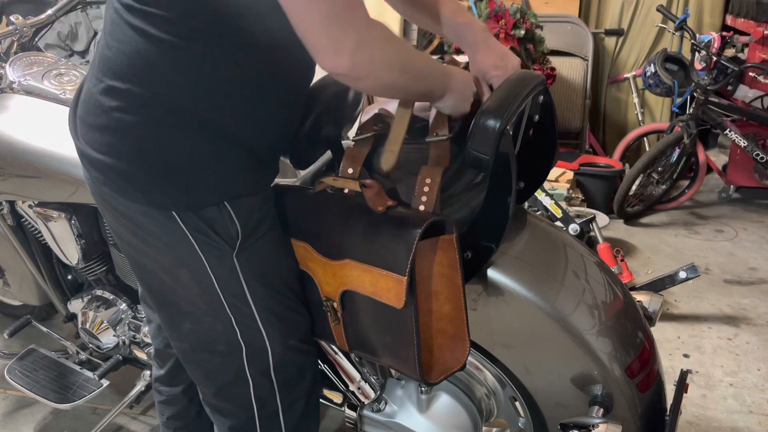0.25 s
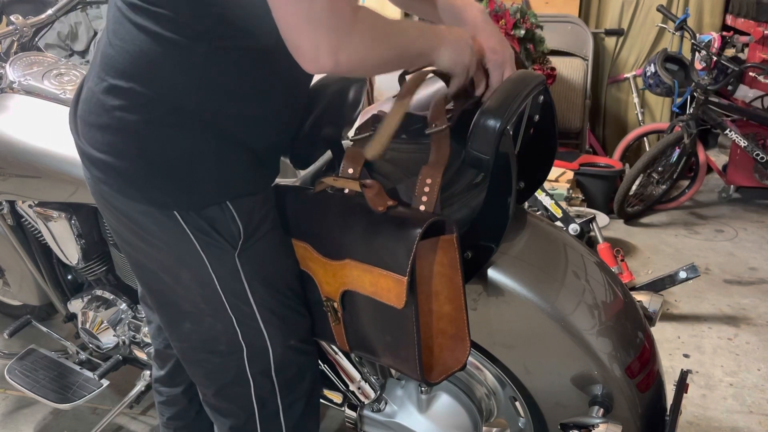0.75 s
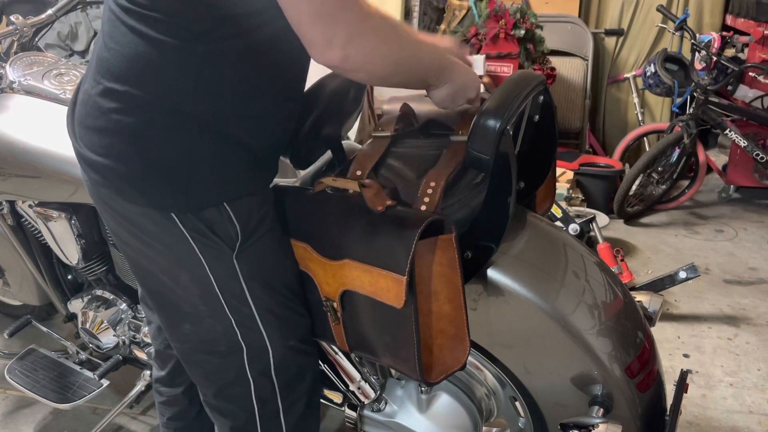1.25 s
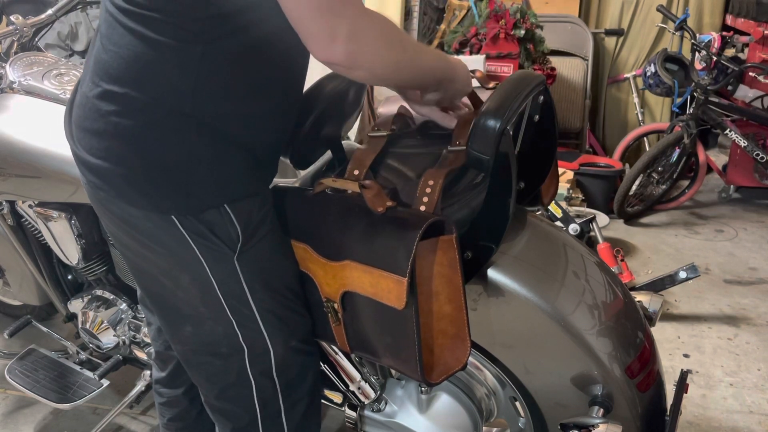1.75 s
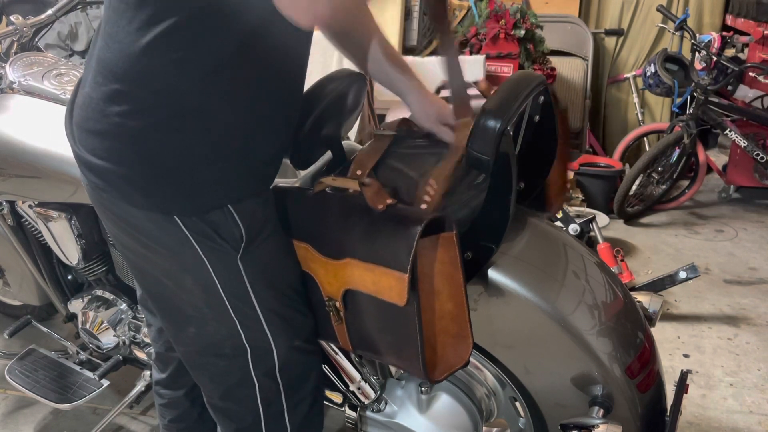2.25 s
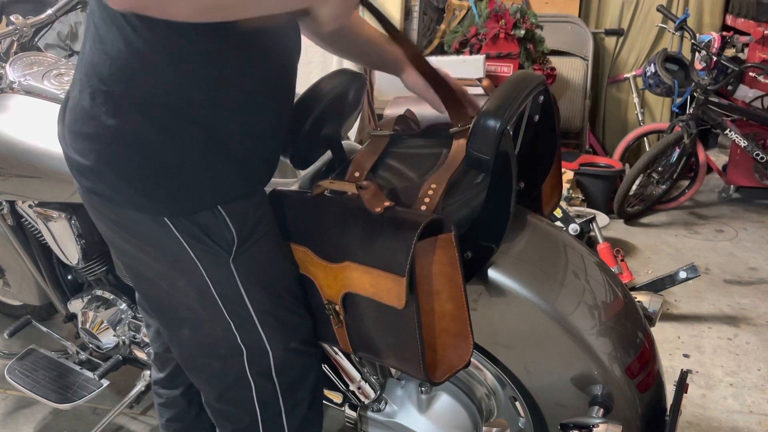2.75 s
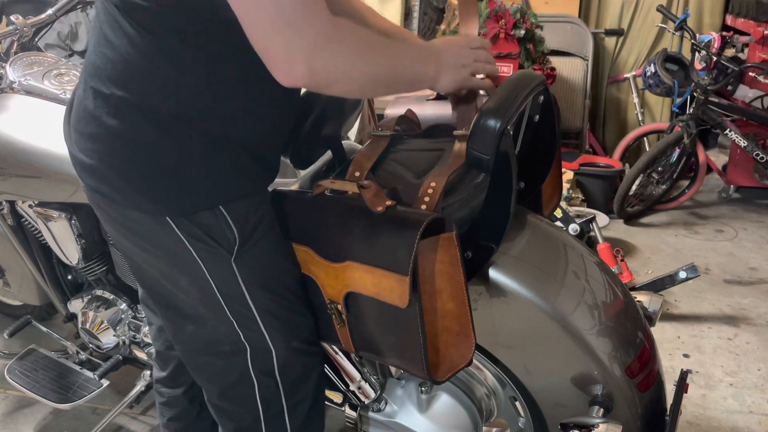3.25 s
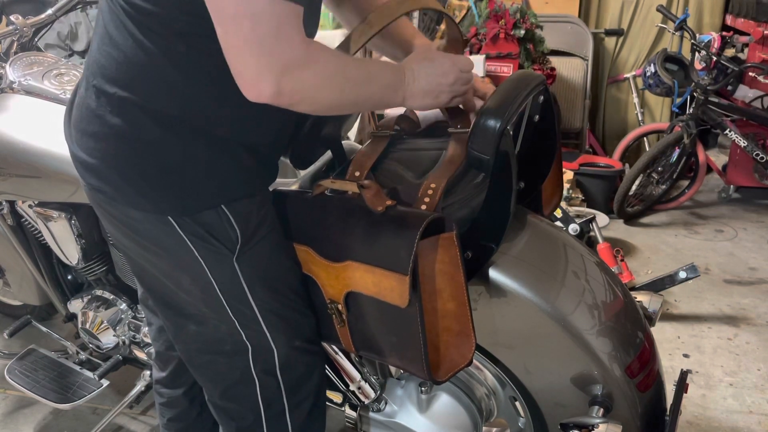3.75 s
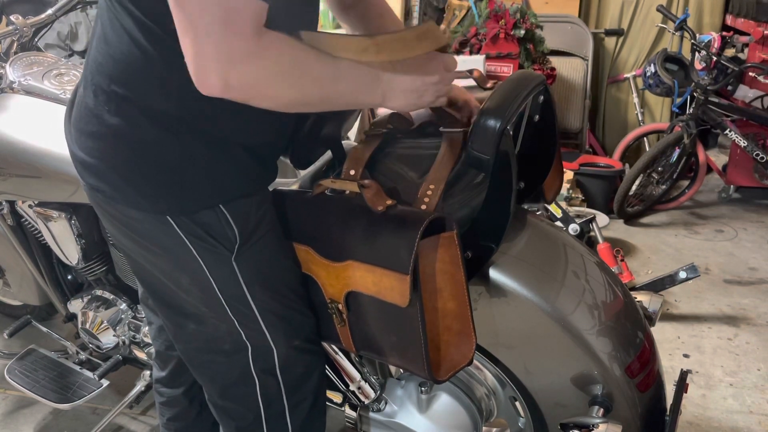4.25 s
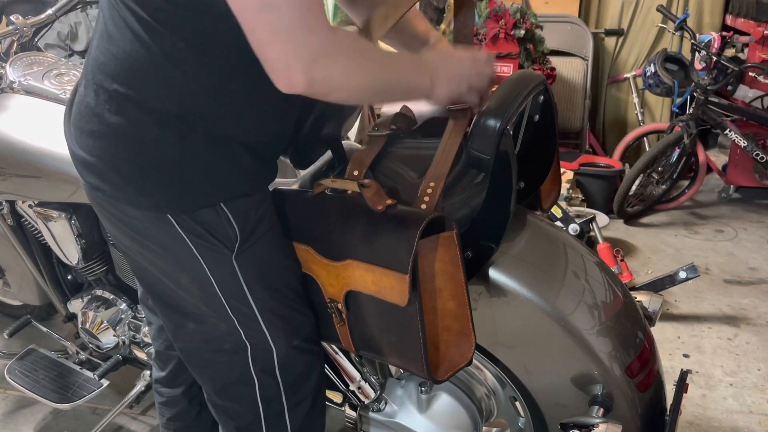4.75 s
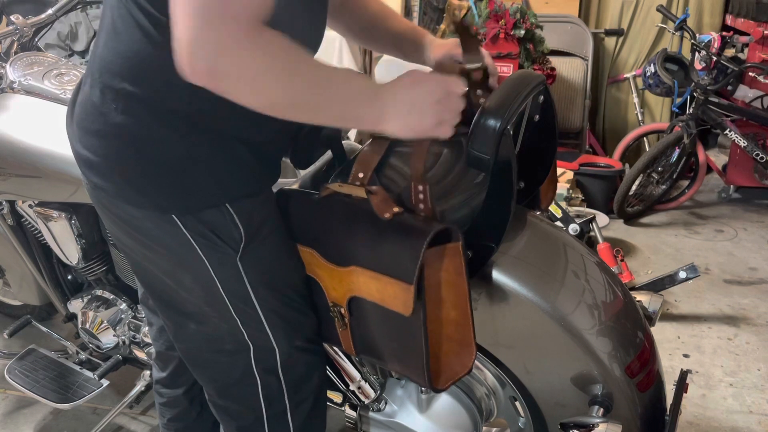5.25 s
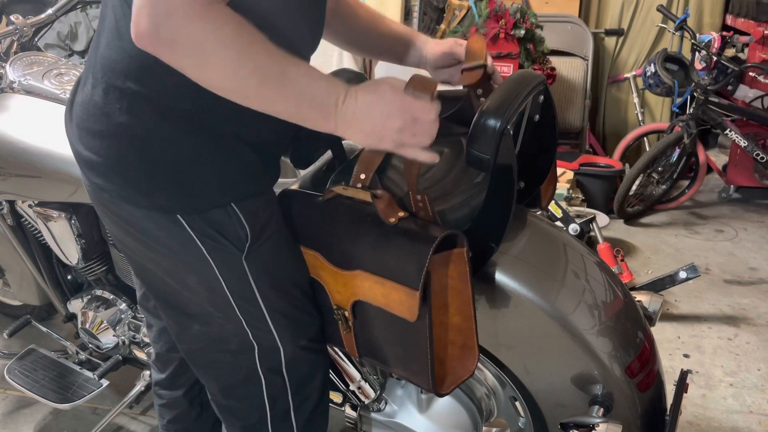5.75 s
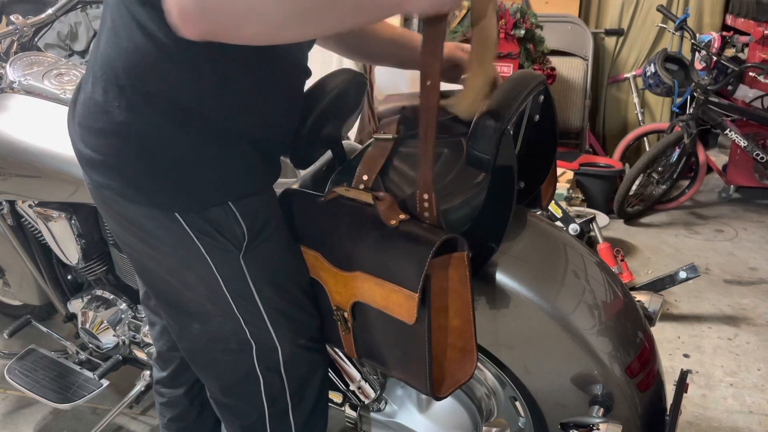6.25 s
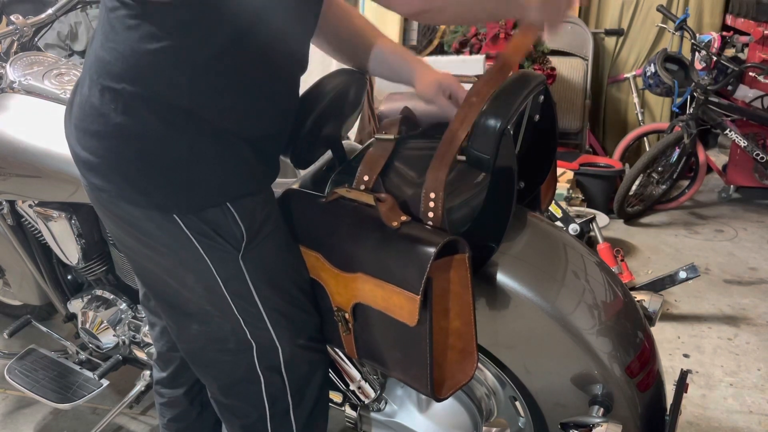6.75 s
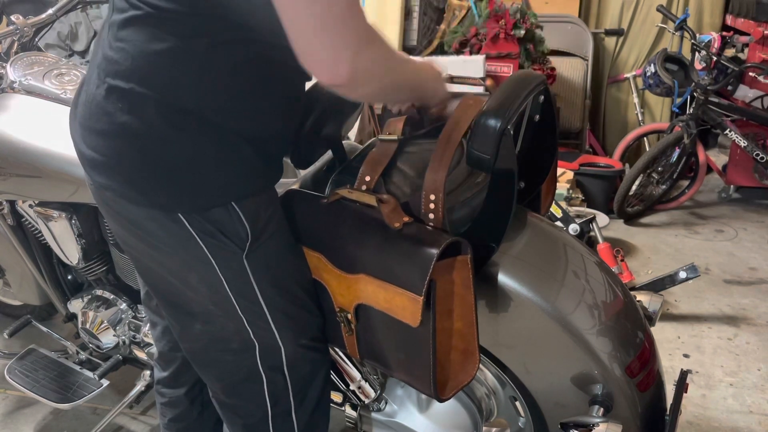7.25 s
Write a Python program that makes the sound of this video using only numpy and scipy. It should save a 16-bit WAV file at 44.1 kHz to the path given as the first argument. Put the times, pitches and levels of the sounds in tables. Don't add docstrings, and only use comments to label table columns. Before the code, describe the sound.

In a quiet garage with faint air and low hum, a soft knock and a slowing run of dry stitch ticks open the first 0.3 seconds. From 0.5 to 1.3 a loose buckle pings high and bright, its roller ringing on thinly, over light rustle and dull knocks. A far motor whines faintly around 0.9 to 1.7, and a short leather creak quickens at 1.65. Around 2.1 to 2.3 comes a forceful cluster: hard clicks, hollow booms, snaps and jingling. Sparse leather ticks follow, with sharper clicks near 3.5 and a quick stitch run at 3.9. From 5.0 to 5.5 a finger-damped clasp clatters rapidly, with a strap hiss at 5.2. Brief clinks return at 5.75 to 5.95, then a whip-like tick, knocks and jingles at 6.5 and 6.85. Handling fades to a last soft knock near 7.3, all with short concrete echoes.

```python
import sys
import numpy as np
from scipy import signal
from scipy.fft import rfft, irfft, next_fast_len
from scipy.io import wavfile
from scipy.ndimage import uniform_filter1d

SR = 44100
rng = np.random.default_rng(int(sys.argv[2]) if len(sys.argv) > 2 else 0)


def linear_from_db(decibels):
    return 10 ** (np.asarray(decibels, float) / 20)


def store_wav(level_fs):
    pcm = np.round(np.clip(np.atleast_2d(level_fs), -1, 1) * 32767)
    wavfile.write(sys.argv[1], SR, pcm.T.astype(np.int16))


N = 331191

# f/Hz, level/dB per Hz
AIR_SPECTRUM = [(15, -53), (25, 5), (200, -10), (293, -7.5), (840, -16), (962, -8), (1370, -22),
                (4140, -23), (13600, -34.5), (14800, -26.5), (16000, -53)]
AIR_DB = -70.5
# f/Hz, level/dB rms
HUM_TONES = [(39.5, -81), (122, -81.5)]

# t/s, low modes/dB, middle modes/dB, high modes/dB, free swing/s
BUCKLE_BLOWS = [(0.0014, -52, -57.5, -55, 0.023), (0.499, -57, -73, -75, .07),
                (0.531, -60, -71, -78, 0.039), (0.5721, -36.5, -51, -54, 0.023),
                (0.59, -27.5, -57, -41, 0.019), (0.6462, -34, -56, -55, 0.011),
                (0.8584, -24.5, -40.5, -44, 0.034), (0.8865, -22.5, -60, -29.5, 0.016),
                (1.0062, -42, -60, -56, 0.014), (1.0334, -51, -51.5, -47, 0.045),
                (1.0985, -46, -55, -42, 0.0072), (1.1043, -39, -62, -35.5, 0.037),
                (1.1182, -28, -58, -32, 0.016), (1.2250, -30.5, -41, -43, 0.033),
                (1.2612, -53, -60, -31, 0.022), (2.092, -52, -51, -42, 0.0053),
                (2.151, -34, -50, -32, 0.016), (2.165, -32, -37, -23.5, 0.037),
                (2.1888, -32, -39, -30.5, 0.036), (2.229, -24, -42, -35, 0.018),
                (2.2471, -20, -45, -37.5, 0.03)]
# t/s, low modes/dB, middle modes/dB, high modes/dB, free swing/s
LATE_BUCKLE_BLOWS = [(5.1, -28, -31, -36, 0.014), (5.1705, -39, -39, -27, 0.021),
                     (5.877, -45, -64, -52, 0.022), (5.8973, -35, -51, -55, 0.023),
                     (5.907, -26, -52, -43, 0.057), (5.93, -33, -46.5, -60, 0.063),
                     (6.214, -63, -58.5, -59, 0.027), (6.506, -53, -57, -51, .014),
                     (6.5264, -30, -40.5, -37, 0.016), (6.548, -39, -53, -43, 0.083),
                     (6.5875, -31, -42, -50, 0.012), (6.7976, -44.5, -56.5, -73, 0.0078),
                     (6.838, -29.5, -66, -35, 0.012), (6.8639, -36, -38.5, -46, .027),
                     (6.88, -43.5, -43, -36, 0.056), (6.93, -45, -68, -54, 0.12),
                     (7.0175, -53, -59, -61, 0.021)]
# f/Hz, level/dB, share of free swing, group (0 low, 1 middle, 2 high, 3 tongue)
BUCKLE_MODES = [(3960, -4, 0.77, -0.5), (4150, -17, 0.64, 3), (8715, 0.5, 1, 1), (8560, -14, 0.63, 2),
                (13730, -2, 0.74, 2), (13300, -19, .7, 2), (14300, -20.5, .6, 2)]
FREE_T60_S, LANDED_T60_S = 0.2, 0.019
CLINK_DB = -4

# t/s, low mode/dB, middle mode/dB, high mode/dB, free swing/s
ROLLER_BLOWS = [(0.0014, -62, -64, -94, 0.024), (0.572, -53, -77, -70, 0.025),
                (0.5901, -51, -67, -72, 0.042), (0.628, -50, -62, -65, 0.041),
                (0.6457, -63, -83, -65, 0.05), (0.8583, -49, -50, -53, 0.052),
                (0.8875, -50, -52, -55, 0.11), (0.9104, -45.5, -62, -60, 0.05),
                (1.1046, -52, -53, -68, 0.042), (1.118, -49, -53, -64, 0.055),
                (1.2235, -53, -46, -66, 0.037), (1.261, -52, -61, -52, 0.05), (2.1504, -52, -43, -39, 0.05),
                (2.1854, -43, -51, -46, 0.048), (2.249, -54, -44, -45, 0.048),
                (5.8754, -57, -57, -77.5, 0.05), (5.9063, -57, -51, -58, 0.048),
                (5.946, -43, -59, -70, 0.1), (6.527, -47.5, -59, -57, 0.05), (6.7989, -61, -75, -69, 0.05),
                (6.8643, -49.5, -57, -47, 0.048), (6.8865, -53, -59, -52, 0.05),
                (7.017, -67, -63, -73, 0.028)]
ROLLER_MODES_HZ = [5330, 9985, 14680]
ROLLER_MODES_DB = [-3, -5, -2]
ROLLER_T60_S = 0.4
# t/s, peak level/dB, f/Hz, t60/s
HOOK_TINKS = [(2.092, -44, 4700, 0.031), (4.45, -58.5, 4100, 0.084), (4.507, -55, 4070, 0.059),
              (4.506, -55, 5450, 0.035), (4.709, -75, 3290, .12), (4.734, -63, 4080, 0.055),
              (4.859, -41, 3920, 0.054), (4.875, -43, 5200, 0.03), (6.53, -44.5, 4000, 0.073),
              (6.568, -46, 4180, .06), (5.755, -44, 1900, 0.014), (5.409, -44, 1800, 0.032),
              (5.459, -43.5, 2330, .02), (6.123, -60, 5300, 0.026), (6.842, -36.5, 4550, 0.028),
              (6.835, -34, 13300, 0.044)]
# t/s, level/dB, f/Hz, width/Hz, t60/s
HOOK_DRAG = (6.53, -45, 4040, 400, .55)

# t/s, peak level/dB, f/Hz, slap level/dB
BAG_KNOCKS = [(0.002, -45, 258, -68), (0.214, -47, 386, -46), (0.4, -50.5, 440, -94),
              (0.777, -51, 394, -51), (0.804, -41, 470, -52), (1.092, -41.5, 285, -47),
              (1.144, -46, 269, -53), (1.397, -49.5, 280, -76), (1.917, -45.5, 347, -74),
              (2.142, -27, 272, -33), (2.171, -28.5, 331, -45), (2.206, -31, 316, -50),
              (2.255, -39, 259, -43), (2.299, -38, 200, -60), (2.446, -44.5, 200, -54),
              (3.262, -56, 310, -52), (3.582, -50.5, 352, -69), (3.699, -55, 355, -49),
              (4.06, -54, 237, -50), (4.143, -49.5, 380, -58), (4.563, -52.5, 292, -70),
              (4.593, -50.5, 334, -68), (4.613, -60.5, 297, -75), (5.105, -46.5, 985, -53.5),
              (5.027, -40.5, 271, -42.5), (5.282, -47.5, 272, -42.5), (5.284, -49, 1010, -62),
              (5.349, -47.5, 343, -61), (5.625, -53, 273, -55), (6.095, -52, 360, -52),
              (6.231, -42, 662, -47), (6.263, -50, 183, -47), (6.517, -39.5, 290, -37.5),
              (6.5215, -37.5, 1173, -40), (6.583, -44.5, 290, -54), (6.836, -38.5, 259, -35.5),
              (7.261, -48, 349, -53)]

# t/s, hand effort level/dB, strap slide level/dB above it
HAND_EFFORT = [(0.0, -71, -16), (0.74, -72, 6), (0.9, -65, -35), (1.04, -70.5, 7.5), (1.15, -58.5, 7),
               (1.36, -73.5, 2.5), (1.8, -70.5, -5), (2.32, -57.5, -13), (2.5, -71, 1), (3.16, -80.5, -1),
               (3.57, -72, 0.5), (4.07, -65.5, 2), (4.3, -77.5, 4), (5.0, -70, 5.5), (5.17, -54.5, 21),
               (5.35, -70.5, 7), (6.1, -75, 8), (6.3, -76, 3.5), (6.43, -76.5, 0), (6.77, -69, -7.5),
               (7.51, -92, -18.5)]
# f/Hz, level/dB per Hz
RUMBLE_SPECTRUM = [(45, -46), (75, -23.5), (120, -8), (200, 5), (280, 9.5), (420, 4), (700, 0), (1100, -24)]
RUSTLE_SPECTRUM = [(400, 7), (800, 12), (1500, 9.5), (2500, 8), (3400, 8), (5000, -28.5)]
HISS_SPECTRUM = [(2500, -18), (4000, 9.5), (5500, 9), (8000, -2.5), (12000, -5.5), (15000, -28.5),
                 (16500, -22)]
RUMBLE_DB, RUMBLE_FOLLOWS = -66.5, 0.65

# first t/s, last t/s, first level/dB, last level/dB, treble level/dB
STITCH_RUNS = [
    (0.0556, 0.29, -36, -45, -28),
]
STITCHES_PER_RUN = [6]
STITCH_JITTER = 0.05
# t/s, peak level/dB, f/Hz, treble level/dB
STITCH_TRIPS = [(2.4145, -35, 3000, -57), (2.433, -37.5, 3410, -71), (2.442, -47, 3960, -62),
                (2.453, -43, 3050, -66), (2.4683, -38, 3430, -67), (2.4917, -35, 3330, -70),
                (3.8571, -44, 2080, -59), (3.8645, -45, 2280, -68), (3.872, -48, 3400, -56),
                (3.889, -37, 4200, -47), (3.908, -38, 4200, -47), (3.925, -39, 4110, -48),
                (3.9454, -33, 5060, -49), (3.9607, -38.5, 5000, -47), (3.9836, -31, 4970, -45),
                (4.665, -63, 3770, -70), (4.6714, -68, 3770, -62), (4.68, -65, 3850, -70),
                (4.6932, -67, 3230, -69)]
# t/s, peak level/dB, f/Hz, treble level/dB
STUD_TICKS = [(0.5974, -56, 3940, -57), (0.7477, -57, 4030, -76), (0.806, -51, 1970, -75),
              (1.1424, -34, 3940, -55), (1.9328, -40.5, 4100, -53), (1.9706, -40, 2770, -42),
              (2.0438, -41.5, 2400, -48.5), (2.143, -25, 2800, -41), (2.1517, -34, 1700, -42),
              (2.166, -21, 4100, -41), (2.1726, -37, 3930, -31), (2.2084, -15.5, 4100, -23),
              (2.2157, -26, 4150, -30), (2.2235, -35, 3960, -35), (2.6033, -47.5, 2160, -59),
              (3.0671, -42.5, 4170, -55), (3.205, -45, 3600, -51), (3.262, -40, 3730, -54),
              (3.308, -46.5, 3530, -46.5), (3.5226, -31.5, 3400, -43), (3.5843, -25.5, 4250, -31.5),
              (3.781, -52, 3200, -58), (3.8263, -60, 2390, -63), (4.15, -41, 3630, -45.5),
              (4.856, -40, 4100, -46), (6.096, -55, 3940, -76), (6.209, -40, 4850, -54),
              (6.591, -36, 3940, -36), (6.7775, -44, 4090, -69), (6.8345, -24.5, 3060, -40.5),
              (3.5238, -31.5, 4310, -50), (0.485, -46.5, 3340, -63), (0.529, -47, 3100, -68),
              (0.5895, -50, 5200, -53)]
# t/s, peak level/dB
LEATHER_SNAPS = [(0.9927, -36), (1.081, -50), (1.188, -39), (1.616, -40), (1.628, -41), (1.8383, -71),
                 (2.069, -35), (2.122, -30), (2.1292, -23), (2.616, -40.5), (2.6632, -40), (2.768, -39),
                 (2.797, -43.5), (2.818, -40), (2.847, -38), (2.856, -46), (3.268, -41), (7.149, -58),
                 (1.844, -52), (3.021, -43.5), (3.439, -42), (3.462, -37.5), (3.618, -54), (3.658, -40),
                 (3.698, -40), (4.172, -38), (4.256, -40), (4.736, -42.5), (6.123, -51), (6.264, -36),
                 (6.488, -47.5), (6.496, -44), (6.966, -42.5), (3.45, -46), (3.471, -45), (3.51, -46),
                 (3.737, -46), (7.263, -47.5)]
SNAP_TREBLE_DB = -29
# t/s, length/s, level/dB
STRAP_WHIP = (6.5215, 0.004, -21.5)

# t/s, level/dB
MOTOR_LEVEL = [(0.8, -101), (0.88, -67.5), (1.3, -72), (1.62, -68.5), (1.75, -77)]
MOTOR_HZ, MOTOR_OCTAVE_DB = 273, -11

# t/s, length/s, first slips/per s, last slips/per s, level/dB, fading/dB per s
CREAKS = [
    (1.648, .2, 105, 165, -59, 60),
    (4.327, .115, 150, 105, -75, -30),
]
# f/Hz, width/Hz, level/dB
STRAP_RESONANCES = [
    [(1890, 340, -3.5), (3200, 690, 3), (4700, 670, -0.5), (5830, 610, -0.5), (7800, 2800, -4)],
    [(3100, 750, -2), (4250, 810, 2.5), (5800, 950, -6), (8000, 1900, -6)],
]
CREAK_EDGE_S = 0.003
SLIP_SCATTER_DB, SLIP_JITTER, SLIP_T60_S = 1.5, 0.07, 0.004

# t/s, length/s, level/dB, fading/dB per s
RATTLES = [(2.141, 0.14, -33.5, 66), (4.85, 0.056, -50.5, 60), (5.01, 0.095, -38, 14),
           (5.094, .17, -40.5, 28), (5.385, 0.11, -39, 7), (5.892, 0.11, -44, 47), (6.509, 0.18, -41, 109),
           (6.836, 0.086, -44.5, 114)]
# f/Hz, width/Hz, level/dB
RATTLE_RESONANCES = [(4100, 3500, 5), (4850, 400, 1.5), (6040, 2000, -22), (8120, 650, -5.5),
                     (12500, 4600, -6), (13400, 1600, -5.5)]

# t/s, peak level/dB, main mode f/Hz, upper modes/dB, t60/s
CLASP_KNOCKS = [(4.9998, -23, 4960, -36.5, 0.011), (5.027, -20.5, 5200, -51.5, 0.017),
                (5.0312, -24, 5200, -55, 0.012), (5.037, -15, 5150, -41, 0.013),
                (5.0425, -23, 4850, -42, 0.014), (5.045, -15, 5570, -30.5, 0.01),
                (5.0506, -18, 6200, -30, 0.012), (5.0644, -29, 4850, -45, 0.013),
                (5.0814, -31.5, 5300, -38, 0.014), (5.1015, -26, 3920, -28.5, 0.018),
                (5.1054, -24, 5100, -27, 0.015), (5.113, -25, 4570, -30, 0.024),
                (5.1282, -21, 5000, -36, 0.014), (5.1354, -18, 4140, -25, 0.016),
                (5.1413, -26.5, 4700, -36.5, 0.018), (5.1504, -23, 5000, -39, 0.012),
                (5.1634, -33.5, 3930, -32, 0.014), (5.1724, -35.5, 4840, -37, 0.01),
                (5.1794, -43, 5160, -44.5, 0.011), (5.1932, -22, 4500, -34, 0.014),
                (5.2007, -24.5, 4570, -29.5, 0.016), (5.2032, -18.5, 5220, -35.5, 0.018),
                (5.214, -24.5, 3930, -43, 0.014), (5.238, -21.5, 5070, -43, 0.019),
                (5.2524, -30, 5030, -43, 0.016)]
# t/s, peak level/dB, main mode f/Hz, upper modes/dB, t60/s
LATE_CLASP_KNOCKS = [(5.3944, -32, 5450, -64, 0.023), (5.4027, -21, 4800, -49, 0.015),
                     (5.4126, -16, 4950, -33.5, 0.017), (5.4177, -25, 5470, -31.5, 0.012),
                     (5.429, -36, 5300, -41, 0.016), (5.4474, -31, 5040, -47, 0.017),
                     (5.459, -19, 4980, -39, 0.025), (5.4654, -25.5, 4820, -47, 0.019),
                     (5.6241, -52, 5330, -66, 0.017), (5.7546, -20.5, 5270, -41, 0.017),
                     (5.7666, -31, 5430, -49, 0.018), (5.7914, -39, 5200, -55, 0.018),
                     (5.841, -39.5, 5860, -53, 0.019)]

# f/Hz, level/dB
ECHO_BANDS = [(150, -13.5), (500, -2.5), (1500, -2), (4000, -6.5), (8000, -1), (13000, -5.5)]
ECHO_DECAYS = [.45, 0.51, 0.36, 0.35, 0.25, 0.079]
METAL_ECHO_DB, METAL_SWING = -3.5, 0.5

# f/Hz, level/dB
MICROPHONE_RESPONSE = [(28, -9), (36, 0), (14500, -0.5), (15500, -0.5), (16500, -26.5)]
TOP_HZ = 16300


def level(x, db):
    return x * linear_from_db(db) / np.sqrt(np.mean(x ** 2))


def colour(x, points):
    size = next_fast_len(len(x))
    hz, db = np.transpose(points)
    gain = linear_from_db(np.interp(np.log(np.fft.rfftfreq(size, 1 / SR) + 1), np.log(hz), db))
    return irfft(rfft(x, size) * gain, size)[:len(x)]


def walk(rate):
    k = int(SR / rate)
    held = np.repeat(rng.standard_normal(N // 20 + 1)[:N // k + 1], k)
    return 1.3 * uniform_filter1d(uniform_filter1d(held, k), k)[:N]


def mode(hz, db, t60, turn, rise=0.00024):
    t = np.arange(int(np.clip(t60, 0.001, 0.8) * SR) + 8) / SR
    decay = linear_from_db(db - 60 * t / max(t60, 0.001))
    return decay * (1 - np.exp(-t / rise)) * np.sin(2 * np.pi * (hz * t + turn))


def crack(hz, width, db, t60, noise):
    edges = np.clip([hz - width / 2, hz + width / 2], 50, SR / 2.1)
    band = signal.lfilter(*signal.butter(2, edges, "band", fs=SR), noise)
    decay = linear_from_db(db - 60 * np.arange(len(noise)) / SR / max(t60, 0.001))
    return band / np.std(band) * decay


def add(track, s, sound):
    i = max(int(s * SR), 0)
    track[i:i + len(sound)] += sound[:N - i]


def grains(rate, scatter_db, t60):
    starts = (rng.random(N) < rate / SR) * linear_from_db(scatter_db * rng.exponential(size=N))
    envelope = signal.lfilter([1], [1, -linear_from_db(-60 / (t60 * SR))], starts)
    return rng.standard_normal(N) * envelope


def gate(s, length_s, edge_s):
    since = np.arange(N) / SR - s
    opened = np.clip(np.minimum(since, length_s - since) / edge_s, 0, 1)
    return opened, np.clip(since, 0, length_s)


def garage():
    t = np.arange(N) / SR
    hum = 0
    for hz, db in HUM_TONES:
        hum = hum + np.sqrt(2) * linear_from_db(db + 2 * walk(3)) * np.sin(2 * np.pi * hz * t)
    air = level(colour(rng.standard_normal(N), AIR_SPECTRUM), AIR_DB)
    return air * linear_from_db(0.93 * walk(3.6)) + hum


def buckle():
    blows = BUCKLE_BLOWS + LATE_BUCKLE_BLOWS
    out, chance = np.zeros(N), rng.standard_normal((len(blows), 1024))
    gaps = np.diff([row[0] for row in blows], append=N / SR)
    for (s, *group_db, free_s), gap, c in zip(blows, gaps, chance):
        blow_db = 10 * np.log10(np.sum(linear_from_db(np.array(group_db)) ** 2))
        clink_db = blow_db + CLINK_DB
        group_db.append(clink_db)
        for k, (hz, db, share, group) in enumerate(BUCKLE_MODES):
            mode_db = group_db[int(round(group))] + db - 2.0 + 0.69 * c[k + 10]
            ring = mode(hz * (1 + 0.0008 * c[k]), mode_db, FREE_T60_S, c[k + 20], rise=11.0 / hz)
            landing = min(share * free_s, gap)
            landed = np.maximum(np.arange(len(ring)) / SR - landing, 0)
            add(out, s, ring * linear_from_db(-60 * landed / LANDED_T60_S))
        add(out, s, crack(4680, 1500, clink_db - 7, 0.025, c))
        add(out, s, crack(10000, 9000, clink_db - 13, 0.005, c[::-1]))
    chatter_db = 1.3 * walk(260)
    return out * linear_from_db(chatter_db)


def roller():
    out, chance = np.zeros(N), rng.standard_normal((len(ROLLER_BLOWS) + len(HOOK_TINKS), 256))
    for (s, *mode_db, free_s), c in zip(ROLLER_BLOWS, chance):
        for k, (hz, db) in enumerate(zip(ROLLER_MODES_HZ, mode_db)):
            pitch = hz * (1 + 0.00099 * c[k])
            ring = mode(pitch, db + ROLLER_MODES_DB[k], ROLLER_T60_S, c[k + 3], rise=0.0012)
            rested = np.maximum(np.arange(len(ring)) / SR - free_s, 0)
            add(out, s, ring * linear_from_db(-60 * rested / 0.08))
    for (s, db, hz, t60), c in zip(HOOK_TINKS, chance[::-1]):
        add(out, s, mode(hz, db, t60, c[0]))
        add(out, s, crack(hz, 1500, db - 4.5, 0.0062, c))
    out = out * linear_from_db(3.5 * walk(140))
    s, db, hz, width, t60 = HOOK_DRAG
    add(out, s, crack(hz, width, db, t60, rng.standard_normal(SR // 2)))
    return out


def knocks():
    out, chance = np.zeros(N), rng.standard_normal((len(BAG_KNOCKS), 8192))
    for (s, db, hz, slap_db), c in zip(BAG_KNOCKS, chance):
        add(out, s, mode(hz, db + 0.39, 0.057, 0, rise=0.0018))
        add(out, s, crack(395, 578, db - 7.5, 0.15, c))
        add(out, s, crack(115, 67, 1.75 * db - 0.5, 0.32, np.roll(c, 999)))
        add(out, s, crack(1460, 1930, slap_db - 5.5, 0.037, c[::-1]))
    return out


def handling():
    s, *columns = np.transpose(HAND_EFFORT)
    rustle_db, slide_db = (np.interp(np.arange(N) / SR, s, c) for c in columns)
    rumble_db = RUMBLE_DB + RUMBLE_FOLLOWS * (rustle_db + 69.5)
    hiss_db = rustle_db + slide_db
    slips = grains(500, scatter_db=2.5, t60=0.012)
    drag = grains(130, scatter_db=2.5, t60=0.092)
    rumble = level(colour(drag, RUMBLE_SPECTRUM), 0) * linear_from_db(rumble_db + 0.59 * walk(29))
    flutter_db = 1.5 * walk(25)
    rustle = level(colour(slips, RUSTLE_SPECTRUM), -0.1) * linear_from_db(rustle_db + flutter_db)
    hiss = level(colour(slips, HISS_SPECTRUM), -6.5) * linear_from_db(hiss_db + flutter_db)
    return rumble + rustle + hiss


def stitches():
    rows = []
    for (first, last, first_db, last_db, treble_db), count in zip(STITCH_RUNS, STITCHES_PER_RUN):
        late, scatter = rng.standard_normal((count, 2)).T
        share = np.linspace(0, 1, count)
        s = first + (last - first) * (share + STITCH_JITTER * late * np.sin(np.pi * share) / count)
        db = first_db + (last_db - first_db) * share + 4 * scatter
        rows += zip(s, db, db + treble_db)
    return rows


def ticks():
    dull = [(s, db, db + SNAP_TREBLE_DB) for s, db in LEATHER_SNAPS] + stitches()
    dull_hz = 3800 * np.exp(0.17 * rng.standard_normal(len(dull)))
    rows = STUD_TICKS + STITCH_TRIPS
    rows = rows + [(s, db - 4.5, hz, treble_db - 8) for (s, db, treble_db), hz in zip(dull, dull_hz)]
    out, chance = np.zeros(N), rng.standard_normal((len(rows) + 1, 512))
    for (s, db, hz, treble_db), c in zip(rows, chance):
        add(out, s, mode(hz, db, 0.0044, 0, rise=0.0001))
        add(out, s, mode(1170, db - 12, 0.0088, 0, rise=0.00017))
        add(out, s, crack(3730, 4400, db - 11, 0.017, c))
        add(out, s, crack(9500, 6040, treble_db + 2.5, 0.0028, c[::-1]))
    s, length_s, db = STRAP_WHIP
    whip = 0
    for hz, width, g in [(13400, 870, 3), (8380, 1430, -8), (7010, 7500, -2.0), (5200, 1260, -11.5)]:
        whip = whip + crack(hz, width, db + g, 0.046, chance[-1])
    closing = np.clip((length_s - np.arange(len(whip)) / SR) / 0.0023, 0, 1)
    add(out, s, whip * closing)
    return out


def whine():
    turns = 2 * np.pi * np.cumsum(MOTOR_HZ * (1 + 0.0026 * walk(4.0))) / SR
    note = np.sin(turns) + linear_from_db(MOTOR_OCTAVE_DB) * np.sin(2 * turns)
    note_db = np.interp(np.arange(N) / SR, *np.transpose(MOTOR_LEVEL), left=-200, right=-200)
    return np.sqrt(2) * note * linear_from_db(note_db + 3.2 * walk(12))


def creak():
    s, length_s, first, last = np.transpose(CREAKS)[:4]
    times = np.ravel([s, s + length_s], "F")
    rate = np.interp(np.arange(N) / SR, times, np.ravel([first, last], "F"))
    wobble, out = walk(90), 0
    size, grit = rng.standard_normal((2, N))
    for (s, length_s, _, _, db, fade_db_s), body in zip(CREAKS, STRAP_RESONANCES):
        opened, since = gate(s, length_s, CREAK_EDGE_S)
        turns = np.cumsum(rate * (1 + SLIP_JITTER * wobble) * (since > 0)) / SR
        slips = np.diff(np.floor(turns), prepend=0) * linear_from_db(SLIP_SCATTER_DB * size)
        scrape = signal.lfilter([1], [1, -linear_from_db(-60 / (SLIP_T60_S * SR))], slips)
        slips = slips + 0.23 * grit * scrape
        rung = 0
        for hz, width, g in body:
            peak = signal.iirpeak(hz, hz / width, SR)
            rung = rung + level(signal.lfilter(*peak, signal.lfilter(*peak, slips)), g)
        out = out + level(rung, db) * opened * linear_from_db(-fade_db_s * since)
    return out


def rattle():
    contacts, effort = grains(780, scatter_db=4.0, t60=0.022), 0
    for s, length_s, db, fade_db_s in RATTLES:
        opened, since = gate(s, length_s, 0.013)
        effort = effort + opened * linear_from_db(db - fade_db_s * since)
    body = 0
    for hz, width, db in RATTLE_RESONANCES:
        body = body + level(signal.lfilter(*signal.iirpeak(hz, hz / width, SR), contacts), db)
    return level(body, -5.0) * effort


def clasp():
    rows = CLASP_KNOCKS + LATE_CLASP_KNOCKS
    out, chance = np.zeros(N), rng.standard_normal((len(rows), 1024))
    for (s, db, hz, upper_db, t60), c in zip(rows, chance):
        add(out, s, mode(hz, db - 3.0, t60, c[0]))
        add(out, s, crack(5260, 670, db - 6.5, 1.07 * t60, c))
        add(out, s, crack(8640, 1498, upper_db + 0.5, 0.016, c[::-1]))
        add(out, s, mode(14200 * (1 + 0.004 * c[5]), upper_db - 11.5 + 3 * c[6], 0.04, c[7]))
        add(out, s, crack(9500, 9500, upper_db - 3, 0.0064, c))
    return out


def echo(x):
    t, tail = np.arange(SR // 2) / SR, 0
    centres = [100] + [row[0] for row in ECHO_BANDS] + [20000]
    for k, ((hz, db), t60) in enumerate(zip(ECHO_BANDS, ECHO_DECAYS)):
        low, high = centres[k], centres[k + 2]
        band = colour(rng.standard_normal(len(t)), [(low, -12), (hz, 0), (high, -12)])
        onset = np.clip(t / 0.0018 - 1, 0, 1)
        band = band / np.std(band) * linear_from_db(-60 * t / t60) * onset
        width = (high - low) / SR
        tail = tail + linear_from_db(db) * band * np.sqrt(width / np.sum(linear_from_db(-120 * t / t60)))
    return signal.fftconvolve(x, tail)[:N]


def scene():
    rings = buckle() + roller()
    near = clasp() + rattle() + ticks() + knocks() + creak() + handling()
    swung = linear_from_db(METAL_ECHO_DB) * rings * (1 - METAL_SWING + METAL_SWING * walk(400))
    return (near + rings + echo(near + swung) + garage() + whine())[None]


def low_pass(x):
    return signal.sosfilt(signal.butter(12, 16520, fs=SR, output="sos"), x)


def record(dry):
    heard = colour(dry[0], MICROPHONE_RESPONSE)[None]
    top_cut = signal.ellip(8, 0.2, 70, TOP_HZ, fs=SR, output="sos")
    mix = signal.sosfilt(top_cut, heard)
    return low_pass(mix)


dry = scene()
out = record(dry)
store_wav(out)
```